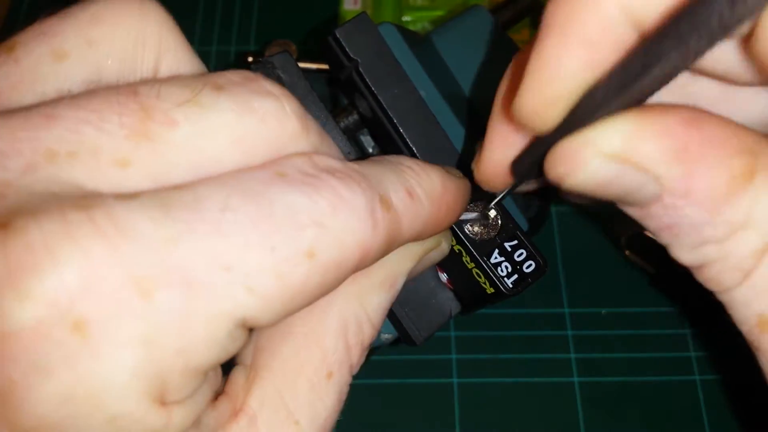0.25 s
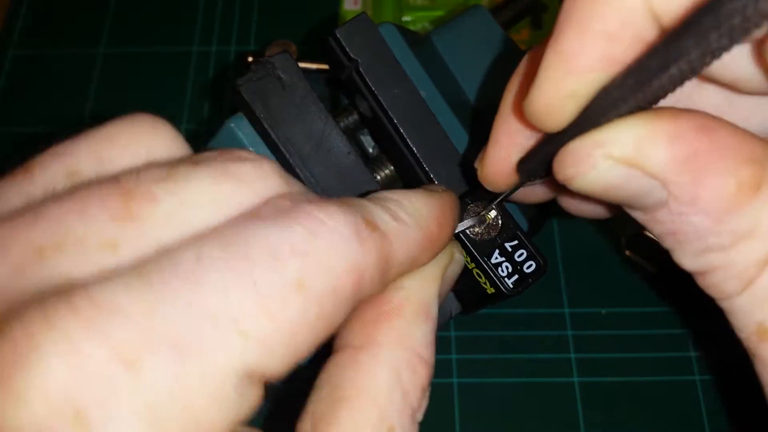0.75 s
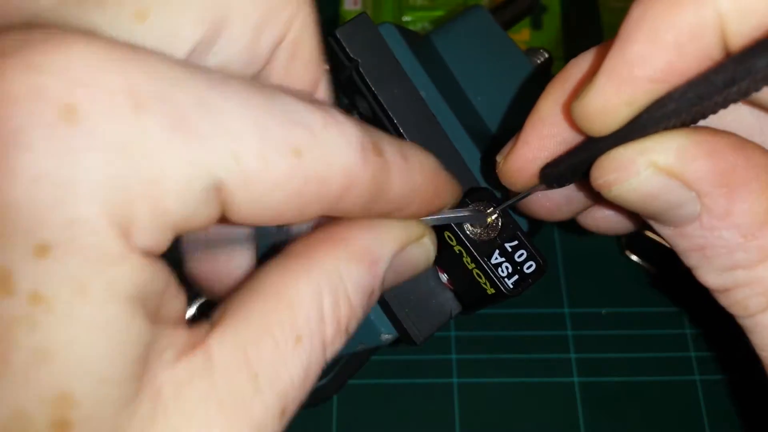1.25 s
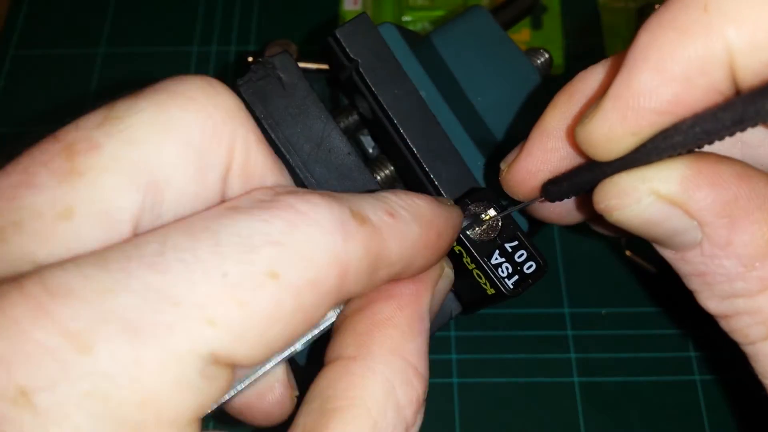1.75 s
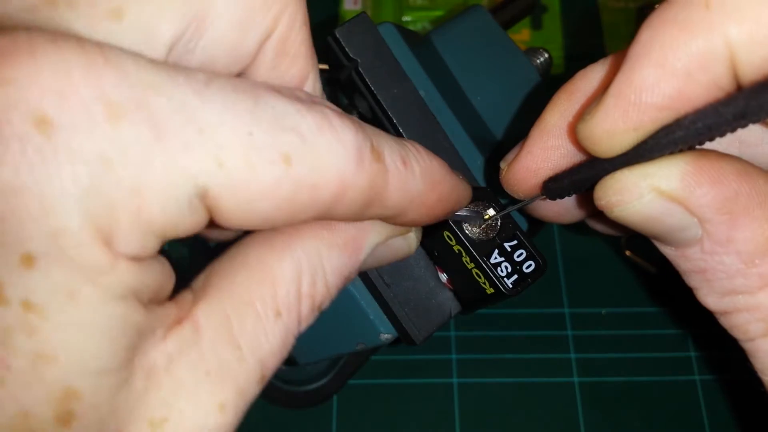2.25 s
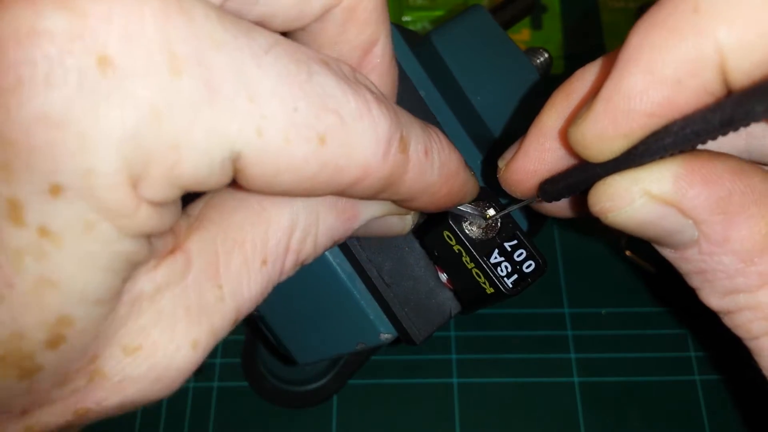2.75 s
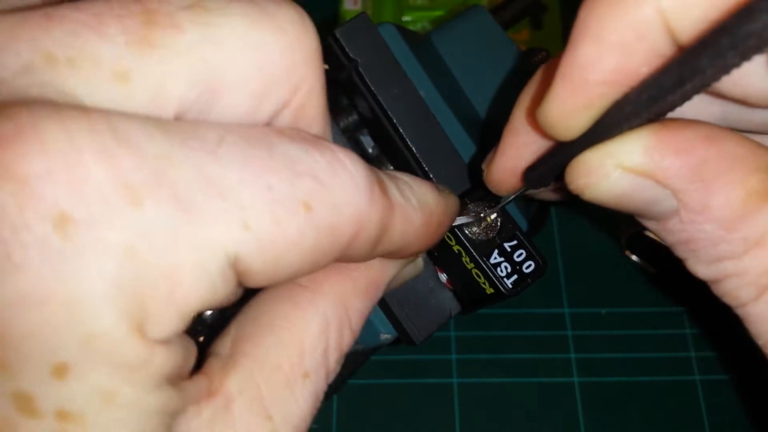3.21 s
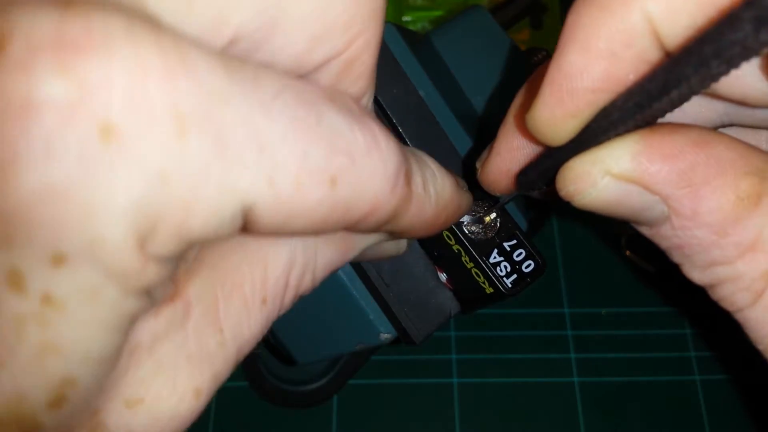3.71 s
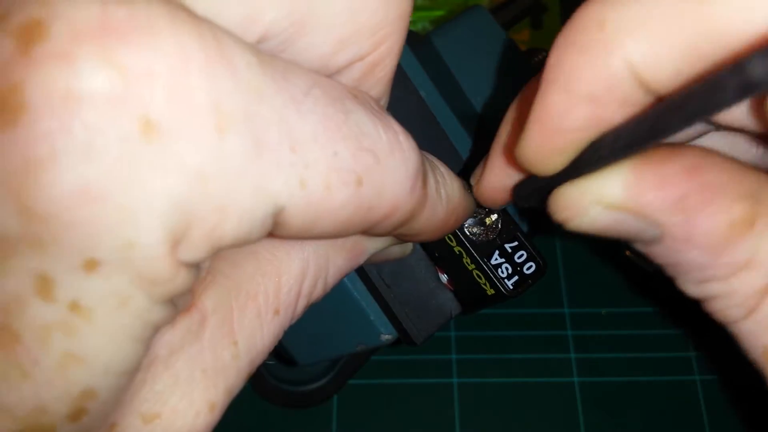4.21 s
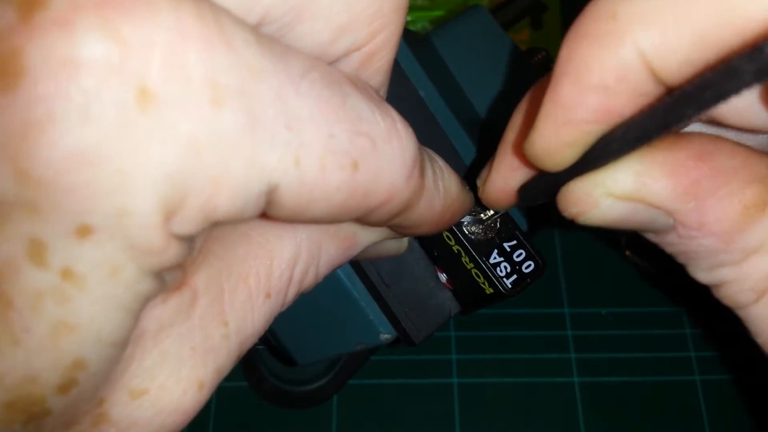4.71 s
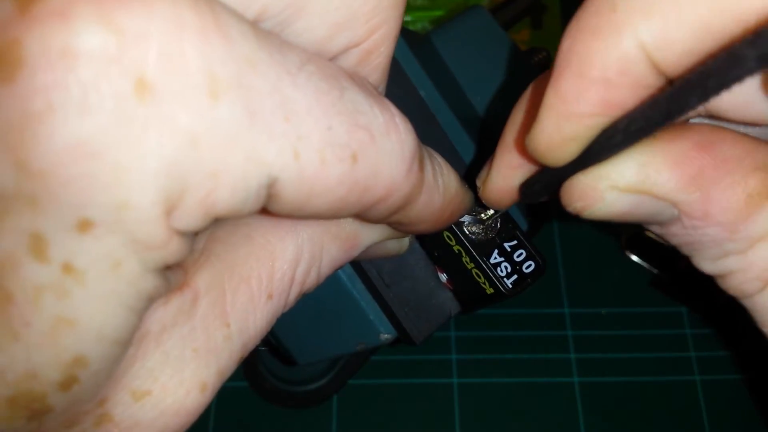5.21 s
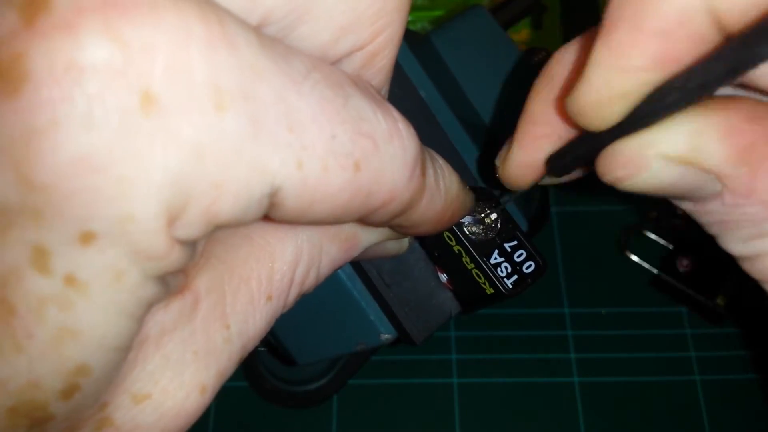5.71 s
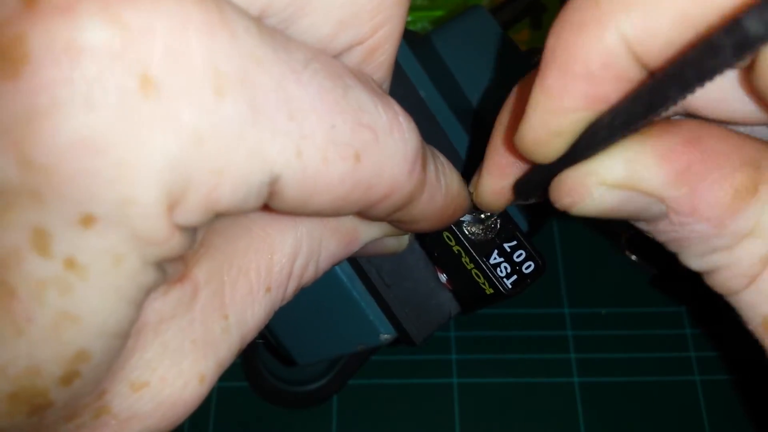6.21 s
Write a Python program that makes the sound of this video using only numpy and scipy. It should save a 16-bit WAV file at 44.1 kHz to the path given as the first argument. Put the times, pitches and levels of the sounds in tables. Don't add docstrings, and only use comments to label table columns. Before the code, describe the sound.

Close, bright pin ticks and small metallic knocks, a quiet pause, then increasingly dense raking in a padlock, with a soft low hum behind.

```python
import sys
import numpy as np
from scipy import signal
from scipy.fft import rfft, irfft
from scipy.io import wavfile
from scipy.ndimage import uniform_filter1d

SR = 44100
rng = np.random.default_rng(int(sys.argv[2]) if len(sys.argv) > 2 else 0)


def digitize_waveform(pressure):
    field = np.atleast_2d(pressure).T
    bounded = np.clip(field, -1, 1)
    quanta = np.round(bounded * 32767).astype(np.int16)
    wavfile.write(sys.argv[1], SR, quanta)


def invert_db(level):
    return 10 ** (np.asarray(level, dtype=float) / 20)


N = 284886

# (time [s], peak [dB], ringing centre [Hz], top band [dB])
FEELING = [(.1146, -31, 7500, 3), (.3452, -35, 7610, 21), (.36, -37, 6450, -10), (.4049, -28, 6870, 16),
           (.4125, -22, 7200, 1), (.4302, -37, 6450, -9), (.4356, -32, 7440, -5), (.4596, -33, 7010, -6),
           (.5245, -24, 8900, 5), (.585, -19, 7320, 6), (.5885, -20, 4970, -1), (.5942, -17, 4940, -6),
           (.6006, -20, 7380, 4), (.6323, -27, 6370, -13), (.9411, -21.5, 5060, 4),
           (1.0018, -19, 7960, 6.5), (1.2532, -36, 5850, 7), (1.3499, -31.5, 5600, 1),
           (1.3584, -34.5, 6050, -16), (1.3649, -37, 6370, -9), (2.972, -42, 6140, -14),
           (3.1163, -25, 8300, 2), (3.1183, -25, 8040, 0), (3.1253, -35, 6670, -4)]
# (time [s], peak [dB], ringing centre [Hz], top band [dB])
RAKING = [(4.1986, -27.5, 5210, -8), (4.2042, -14.5, 8830, -7), (4.216, -17.5, 6300, 0),
          (4.2377, -41, 6240, -1), (4.263, -32, 8610, 1), (4.2702, -17.5, 5560, -8), (4.274, -36, 5250, -1),
          (4.276, -22, 5550, 6), (4.281, -17, 7500, -3), (4.328, -23.5, 5240, -1),
          (4.4447, -18.5, 7950, -1), (4.449, -26, 8830, -6), (4.4435, -19, 7950, -3),
          (4.4687, -35, 6460, -4), (4.4779, -25, 6550, 0), (4.48, -23, 7710, -2), (4.5125, -31, 6290, -4),
          (4.6508, -22, 7450, 9), (4.6552, -15, 8850, 4.5), (4.7073, -35, 5560, -9),
          (4.7555, -31, 5340, -2), (4.763, -37, 5080, -5), (4.777, -23.5, 6980, 1), (4.7895, -24, 6590, 5),
          (4.836, -31, 6330, -2), (4.8661, -37, 5340, -2.5), (4.9184, -38, 5210, -5),
          (4.9284, -37, 5380, -4), (4.9317, -20.5, 6850, 7), (4.934, -21, 6460, 10),
          (4.959, -33, 6680, -12), (5.0059, -39, 4480, -4), (5.01, -28, 5300, 0), (5.014, -26.5, 5470, 1),
          (5.119, -21, 6940, 8.5), (5.1395, -15, 6600, 2.5), (5.2513, -44, 6590, -3),
          (5.2624, -16.5, 7200, 5), (5.266, -21.5, 6600, 5), (5.275, -40, 7060, -3.5),
          (5.2805, -48, 7450, -2), (5.3444, -26.5, 5900, 3.5), (5.382, -17, 5380, 4),
          (5.3986, -39, 4520, -2.5), (5.4184, -40, 6070, -6)]
# (time [s], peak [dB], ringing centre [Hz], top band [dB])
RATTLE = [(5.5052, -27, 4820, 1), (5.5125, -24, 6800, 2), (5.5242, -18, 6630, 6), (5.5318, -16, 5380, 1),
          (5.549, -17, 7280, 7), (5.556, -14, 7190, 2), (5.5709, -36, 5940, -1), (5.59, -19, 4970, -17),
          (5.6017, -22, 5250, -7), (5.6029, -19, 5400, -8), (5.6108, -14.5, 8800, -2),
          (5.6128, -14, 5000, -2), (5.635, -29, 4910, -1), (5.6413, -33, 6630, -3),
          (5.6696, -26.5, 8830, 2), (5.7522, -23.5, 9470, 3), (5.7607, -21, 6550, 2),
          (5.7658, -25, 7150, 0), (5.7825, -13.5, 5340, -4), (5.7918, -19, 6100, -6.5),
          (5.805, -33, 6680, -1), (5.835, -17, 8570, -2.5), (5.843, -24, 7000, -5), (5.8452, -17, 8160, -5),
          (5.8456, -15, 5300, -10), (5.8488, -20, 5170, -3), (5.8536, -20, 6290, 5),
          (5.922, -18.5, 6300, 5)]
# (time [s], peak [dB], ringing centre [Hz], top band [dB])
FRENZY = [(6.0938, -22.5, 6800, 8), (6.0961, -19.5, 6420, 9), (6.102, -20, 6460, 0), (6.116, -22, 5210, 7),
          (6.1182, -17, 5430, 6), (6.1215, -22, 6460, 2), (6.1275, -14, 5440, -3), (6.1405, -23, 5430, 8),
          (6.145, -28, 7410, -3), (6.155, -26, 5810, -2), (6.181, -23, 5560, -11), (6.2052, -19, 8500, -4),
          (6.1896, -20, 5570, -7), (6.192, -21, 5510, 0), (6.195, -26, 5470, -7), (6.1971, -20, 5340, -12),
          (6.2, -16, 5810, -8), (6.2036, -17, 5300, -16), (6.2107, -22, 5300, -9), (6.2323, -27, 5600, -10),
          (6.2639, -21, 6440, 1), (6.355, -20, 9200, 4), (6.3597, -28, 6590, 0), (6.3644, -26, 6420, -5),
          (6.369, -30, 7060, 6), (6.368, -27, 5940, -3), (6.3707, -20.5, 5400, -4), (6.383, -17.5, 5300, 0),
          (6.3894, -14, 5600, -2), (6.395, -27, 7060, -3), (6.4041, -19, 5640, -1), (6.4105, -20, 5600, -4),
          (6.4174, -30, 5470, -4), (6.4222, -26, 6500, 0), (6.432, -18.5, 6460, -3), (6.4445, -36, 5900, 0)]
# (time [s], knock peak [dB], centre [Hz], tick peak [dB])
BUMPS = [(0.124, -42, 1130, -35), (.1565, -42.5, 1060, -41), (0.3965, -43, 1230, -48),
         (0.418, -24, 1830, -24), (.4324, -54, 1470, -45), (0.443, -41, 1490, -26), (.5242, -33, 1500, -37),
         (0.941, -43.5, 2400, -43), (0.9805, -32.5, 1730, -32), (1.254, -47.5, 890, -35),
         (1.3605, -42, 950, -40), (1.3776, -45, 1240, -43), (1.4914, -36.5, 1170, -40),
         (1.725, -40.5, 1220, -43), (2.1932, -45.5, 1090, -46), (2.846, -44.5, 2620, -33.5),
         (3.0085, -33, 1200, -32), (3.109, -30, 2660, -32), (3.1834, -36, 2610, -36),
         (3.3966, -38.5, 900, -43.5), (3.4585, -38.5, 940, -42), (3.458, -45, 3600, -47),
         (3.5932, -47, 760, -38)]
# (time [s], knock peak [dB], centre [Hz], tick peak [dB])
LANDINGS = [(4.1296, -26.5, 2150, -23), (4.2863, -37.5, 1050, -42), (4.3983, -35.5, 980, -34),
            (4.4866, -21.5, 2340, -19), (4.504, -47, 1760, -24), (4.514, -36, 1980, -29),
            (4.713, -25, 2120, -22.5), (4.8396, -25.5, 2100, -24.5), (5.0144, -26, 2200, -26.5),
            (5.188, -29.5, 1500, -23.5), (5.406, -22.5, 2470, -20), (5.4876, -31.5, 2200, -15.5),
            (5.549, -41, 1800, -32), (5.6132, -22.5, 2370, -19), (5.8609, -23.5, 2420, -22),
            (6.0056, -29.5, 3000, -18), (6.2072, -31, 2770, -27), (6.2193, -20, 3060, -23),
            (6.266, -47.5, 1910, -34)]
# (frequency [Hz], width [Hz], level [dB])
BODY = [(705, 65, 0), (845, 55, 0), (1205, 50, -4), (1635, 90, -3), (2120, 120, -4), (2590, 120, -5),
        (3110, 130, -3), (3780, 100, -10)]
# (frequency [Hz], left minus right [dB])
NEAR_BALANCE = [(60, -8), (180, 4), (550, -4.5), (1650, -2.5), (4970, -4), (15000, -13)]
# (frequency [Hz], left minus right [dB])
AIR_BALANCE = [(60, -1), (120, -3.5), (150, -5), (240, -2.5), (480, -2.5), (950, -4), (1900, -1.5),
               (3800, -4.5), (6500, -10), (8500, -12), (15000, -5)]


def evened(x):
    return x / np.sqrt(np.mean(x ** 2) + 1e-20)


def read(points, hz):
    f, value = np.transpose(points)
    return np.interp(np.log(hz + 1), np.log(f + 1), value)


def sides(points, hz):
    return invert_db(np.outer([.5, -.5], read(points, hz)))


def humps(modes, hz, widen):
    power = sum(invert_db(2 * db) / (1 + (2 * (hz - f) / (widen * w)) ** 2) for f, w, db in modes)
    return np.sqrt(power)


def nearness(hz, centre_hz, spread):
    return np.exp(-.5 * (np.log(hz / centre_hz + 1e-9) / spread) ** 2)


def causal(gain):
    log_gain = np.log(np.maximum(gain, 1e-5))
    circle = np.concatenate([log_gain, log_gain[-2:0:-1]])
    return np.exp(np.conj(signal.hilbert(circle)))[:len(gain)]


def blows(rows, colour, rise_s, decay_s, buzz, buzz_rise_s, buzz_s, same):
    size, lead = 2048, 128
    t = (np.arange(size) - lead) / SR
    hz = np.fft.rfftfreq(size, 1 / SR)
    ears = np.array([causal(gain) for gain in sides(NEAR_BALANCE, hz)])
    out = np.zeros((2, N + size))
    for s, db, *looks in rows:
        noise = rng.standard_normal((2, size))
        life = rng.uniform(.7, 1.4)
        noise[1] = same * noise[0] + np.sqrt(1 - same ** 2) * noise[1]
        snap = np.exp(np.where(t < 0, t / rise_s, -t / decay_s) / life)
        ragged = buzz * invert_db(-.36 * (db + 20))
        shape = snap + ragged * np.exp(np.where(t < 0, t / buzz_rise_s, -t / buzz_s) / life)
        sound = irfft(rfft(noise * shape) * causal(colour(hz, *looks)) * ears)
        peak = np.sqrt(uniform_filter1d((sound ** 2).mean(0), size=40).max())
        out[:, round(s * SR) - lead:][:, :size] += invert_db(db) * sound / peak
    return out[:, :N]


def tick_colour(hz, centre_hz, top_db):
    # (frequency [Hz], width [Hz], level [dB])
    pin_modes = [(5470, 5600, 6), (6070, 75, -38), (7700, 6.3, -15), (7810, 43, -23), (9150, 1230, -31),
                 (10980, 240, -38), (14300, 150, 17), (14600, 170, -11)]
    near = nearness(hz, centre_hz, 0.15)
    top = 1 / (1 + (10500 / (hz + 1)) ** 12)
    pins = (0.41 + near) * humps(pin_modes, hz, 8.4) * (1 - top) + invert_db(top_db - 3.0) * top
    keyway = 0.06 + 1 / (1 + (3480 / (hz + 1)) ** 26)
    return pins * keyway


def all_ticks():
    # (time [s], peak [dB], ringing centre [Hz], top band [dB])
    further_ticks = [(5.5865, -25.5, 5300, -4), (5.6071, -28, 6500, -2), (6.182, -26, 5600, -1),
                     (6.1378, -25, 5600, -2), (6.38, -27, 6000, 0), (6.388, -18, 5900, 6),
                     (6.3935, -25, 5800, -3), (6.403, -20, 5700, 1), (4.77, -41, 5200, -5),
                     (5.8575, -20, 6500, 6), (6.2155, -29, 7500, -4)]
    tick_lead_s, landing_hz, landing_top_db = 0.00069, 6050, -1
    landed = [(s - tick_lead_s, db, landing_hz, landing_top_db) for s, _, _, db in BUMPS + LANDINGS]
    return FEELING + RAKING + RATTLE + FRENZY + further_ticks + landed


def pin_ticks():
    # (time [s], peak [dB], ringing centre [Hz], top band [dB])
    snaps = [(3.4576, -17, 4650, -2), (5.5026, -20.5, 5100, -5), (5.7772, -16, 7000, 2),
             (6.1843, -17.5, 5600, -8), (6.2187, -13, 5200, -2), (6.4208, -14, 7400, 5),
             (.5877, -15, 8300, -1), (.4168, -15, 7400, 2), (3.1085, -24, 6600, 4),
             (4.487, -14.5, 6400, -2), (4.4582, -23, 9000, -1)]
    ticks = blows(all_ticks(), tick_colour, rise_s=.00018, decay_s=.00022,
                  buzz=.42, buzz_rise_s=.0005, buzz_s=.0024, same=.3)
    ticks += blows(snaps, tick_colour, rise_s=.00004, decay_s=.00007,
                   buzz=.13, buzz_rise_s=.0003, buzz_s=.002, same=.5)
    return ticks


def knock_colour(hz, centre_hz):
    near = nearness(hz, centre_hz, .65)
    modes = 1 + .3 * humps(BODY[4:], hz, 2.5)
    vise = .7 * (1500 / centre_hz) ** 1.65 * humps(BODY[:4], hz, 1.0)
    low_cut = 1 + (330 / (hz + 1)) ** 4
    dull = (1 + (hz / 4600) ** 6) * np.sqrt(1 + (hz / (2.6 * centre_hz)) ** 4)
    return ((0.5 + near) * modes + vise) / low_cut / dull


def all_knocks():
    # (time [s], knock peak [dB], centre [Hz])
    nudges = [(.6365, -40.5, 1680), (.592, -44, 1500), (.604, -43, 1400), (5.555, -44, 1200),
              (5.778, -49, 1200), (6.12, -45, 1300), (.51, -41.5, 1000), (1.3508, -43.5, 1500),
              (1.388, -42.5, 850), (1.605, -49, 2200), (1.4935, -48, 850), (2.97, -49, 1700),
              (3.12, -51, 3000), (3.0101, -27, 840), (4.4888, -29, 1400), (3.0355, -42.5, 900),
              (5.27, -43, 900), (5.345, -47, 900), (5.5135, -40, 900), (5.539, -37.5, 900),
              (5.639, -40, 1900), (5.764, -40.5, 1110), (5.9015, -49, 900), (5.92, -43.5, 900),
              (6.1055, -48, 900), (6.134, -40.5, 1100), (6.234, -46, 1300), (6.252, -49, 1900),
              (6.3775, -50, 900), (6.4375, -40, 1800)]
    shake_from_db, shake_db, shake_hz, shake_spread = -21.2, -47, 1310, .25
    single = FEELING + RAKING + RATTLE + FRENZY
    luck = rng.uniform(-1, 1, len(single))
    shakes = [(row[0], shake_db, shake_hz * (1 + shake_spread * u))
              for row, u in zip(single, luck) if row[1] > shake_from_db]
    return [row[:3] for row in BUMPS + LANDINGS] + nudges + shakes


def ring_colour(hz, centre_hz):
    near = nearness(hz, centre_hz, 0.35)
    return (0.1 + near) * humps(BODY[:4], hz, 1.1) ** 2


def vise_rings(struck):
    lag_s, ring_db, fall_db_per_octave = 0.0018, -4.5, 8
    return [(s + lag_s, db + ring_db - fall_db_per_octave * np.log2(hz / 800), hz)
            for s, db, hz in struck]


def body_knocks():
    struck = all_knocks()
    knocks = blows(struck, knock_colour, rise_s=.00004, decay_s=.00006,
                   buzz=.17, buzz_rise_s=.001, buzz_s=.004, same=.55)
    knocks += blows(vise_rings(struck), ring_colour, rise_s=.0007, decay_s=.002,
                    buzz=.2, buzz_rise_s=.0014, buzz_s=.006, same=.7)
    return knocks


def scrape():
    # (start [s], end [s], level [dB])
    strokes = [(0.407, 0.443, -44), (0.584, 0.607, -41), (0.598, 0.641, -49.5), (4.2, 4.224, -38),
               (4.262, 4.295, -39), (4.447, 4.457, -62), (4.476, 4.495, -39), (5.506, 5.513, -39),
               (5.52, 5.542, -38), (5.542, 5.566, -41), (5.582, 5.594, -45), (5.595, 5.61, -43),
               (5.607, 5.621, -37), (5.756, 5.773, -40), (5.773, 5.798, -45), (5.83, 5.845, -44),
               (5.842, 5.866, -32.5), (6.098, 6.11, -41), (6.112, 6.149, -39.5), (6.193, 6.203, -39),
               (6.202, 6.223, -29.5), (6.366, 6.4, -42), (6.397, 6.441, -43.5), (5.643, 5.687, -51),
               (6.243, 6.279, -49)]
    # (frequency [Hz], density [dB per Hz])
    spectrum = [(300, -44), (750, -5), (1300, -28.5), (3200, -9), (3600, -5), (4700, -2.5), (6000, -6),
                (8500, -1.5), (14500, -12.5), (16500, -20)]
    ramp_s, slips_per_s = 0.0029, 4200
    t = np.arange(N) / SR
    level = sum(invert_db(db) * np.clip(np.minimum(t - start, end - t) / ramp_s, 0, 1)
                for start, end, db in strokes)
    sizes = invert_db(2.8 * np.minimum(rng.exponential(1, N), 3))
    slips = sizes * (rng.random(N) < slips_per_s / SR)
    lumps = signal.lfilter([1], [1, -.94], slips)
    noise = rng.standard_normal((2, N))
    noise[1] += 0.16 * noise[0]
    hz = np.fft.rfftfreq(1024, 1 / SR)
    keyway = 1.6 / (1 + ((hz - 5440) / 350) ** 2)
    taps = irfft(causal(invert_db(read(spectrum, hz)) * (1 + keyway)) * sides(NEAR_BALANCE, hz))
    taps = np.roll(taps, 16, axis=1)
    return level * evened(signal.oaconvolve(noise * lumps, taps, axes=1)[:, :N])


def thuds(start_hz=260, end_hz=98, glide_s=0.0087, decay_s=0.017):
    # (time [s], peak [dB])
    bench_hits = [
        (0.416, -33.5),
        (.5, -39),
        (3.008, -42),
        (4.275, -41),
        (4.486, -39),
        (5.613, -40),
        (5.861, -39),
        (6.219, -36),
    ]
    t = np.arange(5000) / SR
    out = np.zeros(N + 5000)
    turns = np.cumsum(end_hz + (start_hz - end_hz) * np.exp(-t / glide_s)) / SR
    thud = np.e * t / decay_s * np.exp(-t / decay_s) * np.sin(2 * np.pi * turns)
    for s, db in bench_hits:
        out[round(s * SR):][:len(t)] += invert_db(db) * thud
    return out[:N] * invert_db([[-4.5], [-1.5]])


def room(x):
    # (frequency [Hz], t60 [s])
    decay_times = [(500, 0.59), (1300, 0.24), (3500, 0.35), (7000, 0.36), (14000, 0.26)]
    taps = np.zeros((2, 16000))
    at = np.arange(200, 15900, 20) + rng.integers(0, 20, (2, 785))
    np.put_along_axis(taps, at, rng.choice([-1., 1.], at.shape), 1)
    hz, t, z = signal.stft(taps, SR, nperseg=256)
    fade = invert_db(-60 * t / read(decay_times, hz)[:, None])
    tail = signal.istft(z * fade, SR, nperseg=256)[1]
    return signal.fftconvolve(x, tail / np.linalg.norm(tail[0]), axes=1)[:, :N]


def motor():
    # (multiple, level [dB])
    lines = [(1, -23), (2, -5), (3, -2), (4, -10.5), (5, -2), (6, -20.5), (7, -17.5), (8, -15), (9, -18.5),
             (10, -18), (11, -19), (12, -60), (13, -84), (14, -21.5)]
    # (time [s], level [dB])
    hum_swell = [(0.0, -66), (0.03, -58), (0.97, -54.5), (1.01, -59), (1.76, -50), (1.94, -61), (2.48, -52),
                 (2.86, -61), (3.04, -50.5), (3.56, -59), (3.83, -53), (5.92, -54.5), (6.04, -64),
                 (6.26, -46), (6.32, -63), (6.46, -59)]
    shaft_hz, motor_db, swell_trim_db = 48.87, -57, 52.5
    low_lag_rad, high_lag_rad = .3, 0.82
    t = np.arange(N) / SR
    out = np.zeros((2, N))
    swell_db = np.interp(t, *np.transpose(hum_swell)) + swell_trim_db
    for k, db in lines:
        waver = evened(sum(np.sin(2 * np.pi * (f * t + rng.random())) for f in (.7, 1.6, 2.9, 5.3)))
        level_db = db + .7 * waver + (swell_db if k == 2 else 0)
        lag = np.array([[low_lag_rad if k < 3 else high_lag_rad], [0]])
        line = invert_db(level_db) * np.sin(2 * np.pi * (k * shaft_hz * t + rng.random()) - lag)
        out += np.sqrt(2) * line * sides(AIR_BALANCE, np.array([k * shaft_hz]))
    return invert_db(motor_db) * out


def air(air_db=-58, patchy_db=1.0):
    # (frequency [Hz], density [dB per Hz])
    spectrum = [(20, -18), (70, -9.5), (130, -6), (280, -3), (480, -15.5), (820, -16), (1100, -22),
                (3230, -27.5), (7110, -21), (10100, -34), (15200, -30), (16000, -52)]
    # (frequency [Hz], left-right correlation [-1..1])
    likeness = [(25, .82), (60, 0.95), (150, 0.8), (380, 0.55), (950, 0.0), (2380, -0.06), (5980, 0.01),
                (15000, -0.01)]
    frames = N // 512 + 5
    hz = np.fft.rfftfreq(2048, 1 / SR)
    a, b, c, d, patches = rng.standard_normal((frames, 1025, 5)).T
    patches = uniform_filter1d(patches, size=6, axis=1)
    patches = evened(uniform_filter1d(patches, size=20, axis=0))
    same = np.clip(read(likeness, hz), -1, 1)[:, None]
    left = a + 1j * b
    right = same * left + np.sqrt(1 - same ** 2) * (c + 1j * d)
    z = np.array([left, right])
    z *= sides(AIR_BALANCE, hz)[:, :, None] * invert_db(read(spectrum, hz)[:, None] + patchy_db * patches)
    return invert_db(air_db) * evened(signal.istft(z, nperseg=2048, noverlap=1536)[1][:, :N])


def scene():
    # (time [s], gain [dB])
    gain_steps = [(0, 11.5), (1.2, 11.5), (2.3, 10.5), (3.9, 11), (4.4, 10.5), (5.53, 12), (5.58, 9),
                  (6.05, 6), (6.12, 6), (6.3, 7), (6.46, 2.5)]
    bright = invert_db(-2.0) * pin_ticks() + invert_db(5.5) * scrape()
    body = invert_db(1.0) * body_knocks()
    echoes = room(invert_db(-11.5) * bright + invert_db(-6.0) * body)
    gain_db = np.interp(np.arange(N) / SR, *np.transpose(gain_steps))
    background = (motor() + air()) * invert_db(gain_db)
    return bright + body + thuds() + echoes + background


def roll_off(x):
    return signal.sosfilt(signal.butter(12, 16790, fs=SR, output="sos"), x)


def record(dry):
    edge_hz = 16000
    taps = signal.firwin(255, edge_hz, window=("kaiser", 9), fs=SR)
    limited = signal.oaconvolve(dry, taps[None], "same")
    return roll_off(limited)


dry = scene()
out = record(dry)
digitize_waveform(out)
```